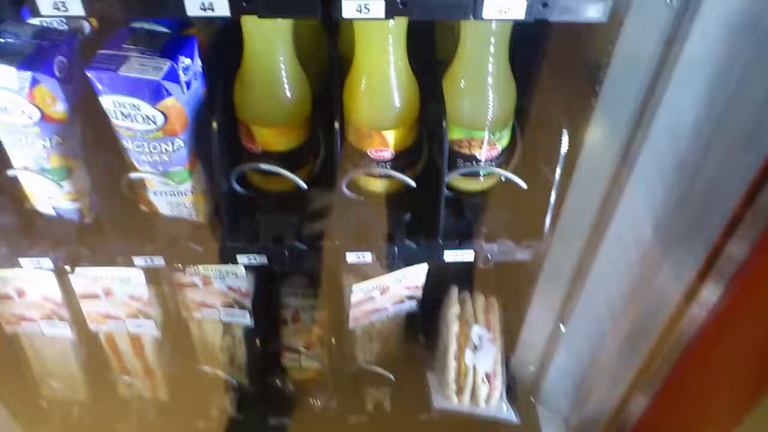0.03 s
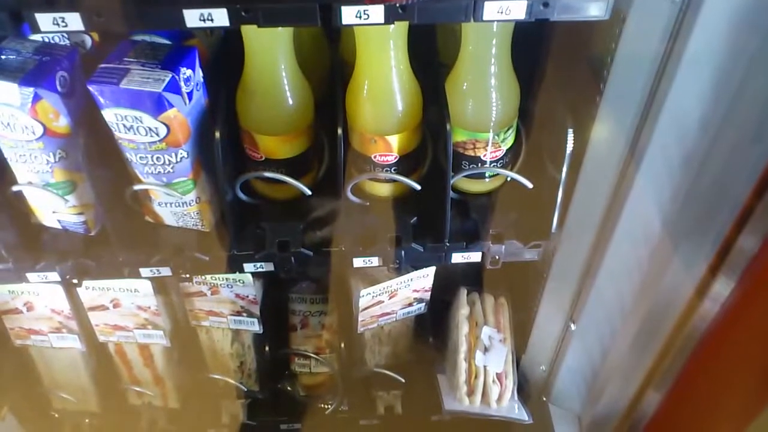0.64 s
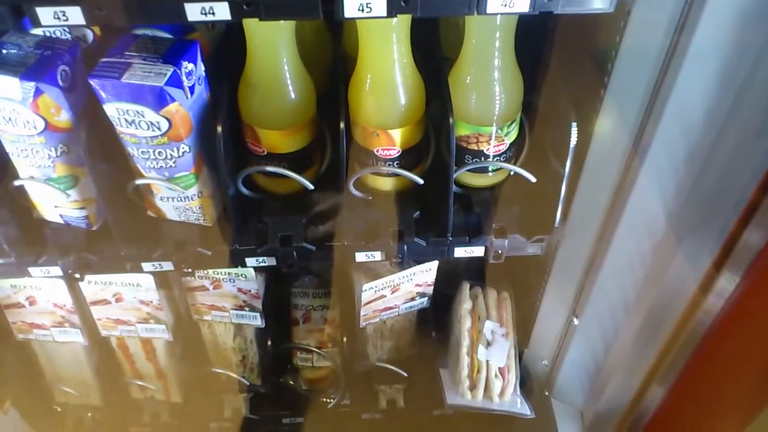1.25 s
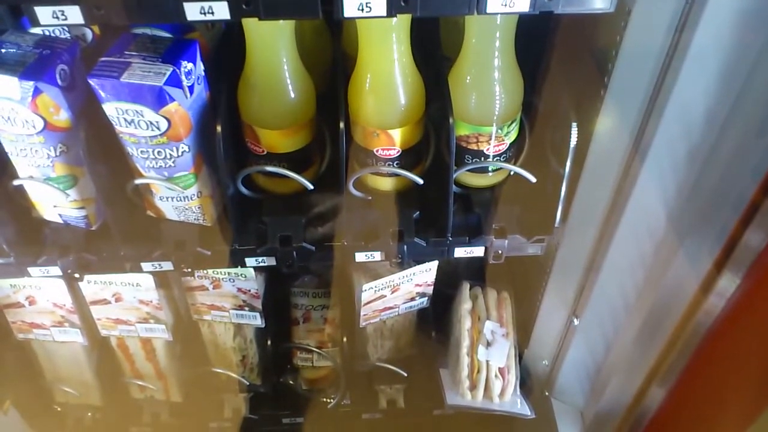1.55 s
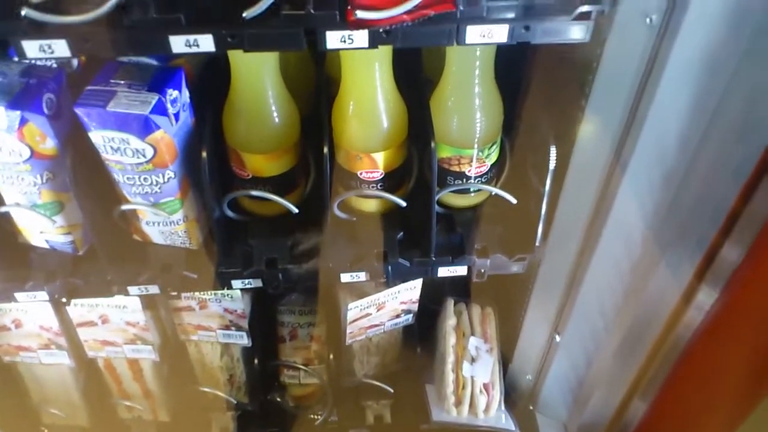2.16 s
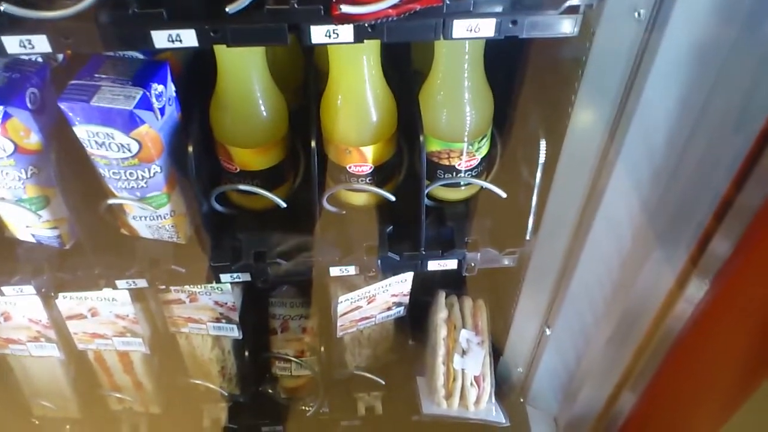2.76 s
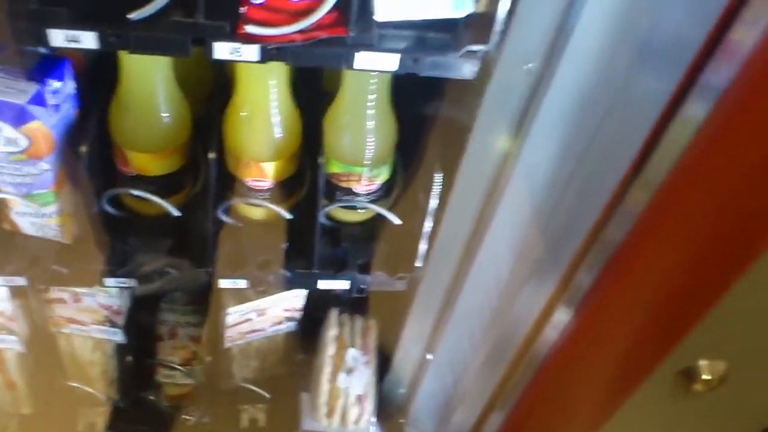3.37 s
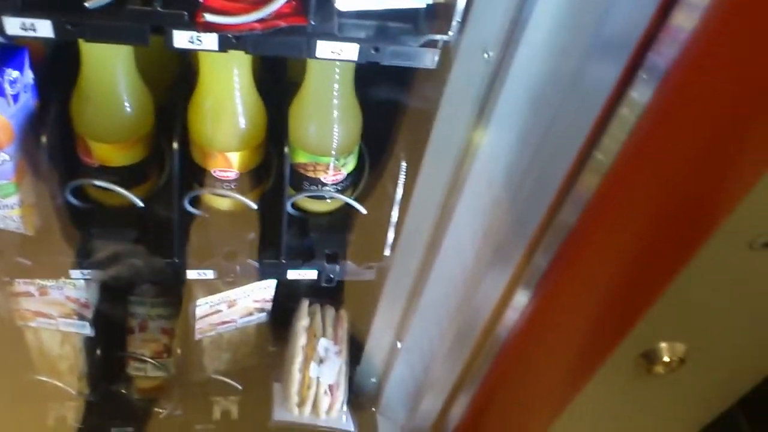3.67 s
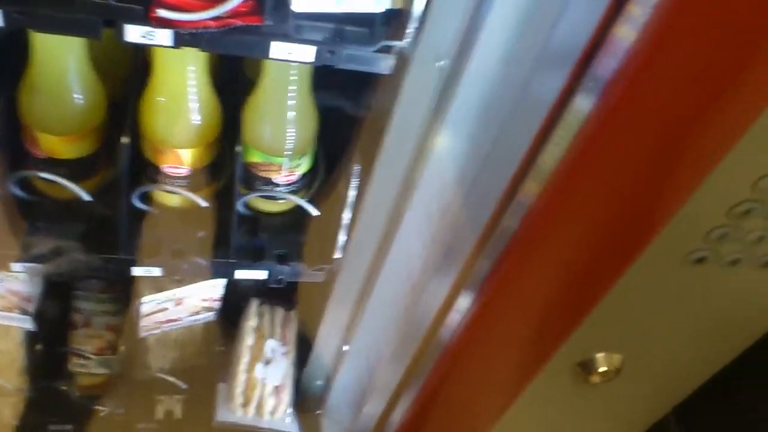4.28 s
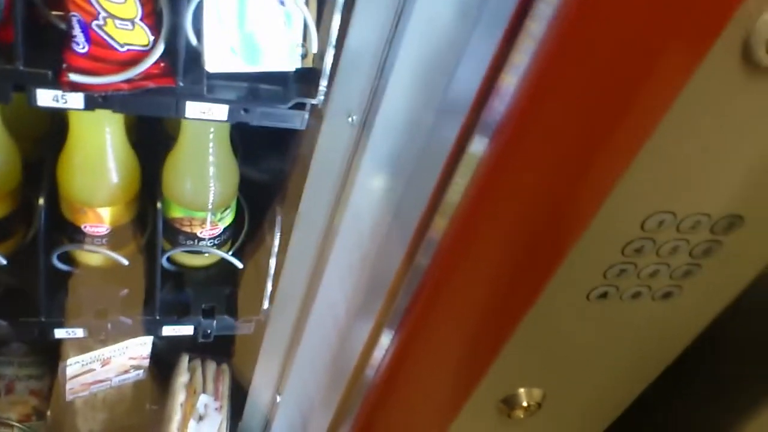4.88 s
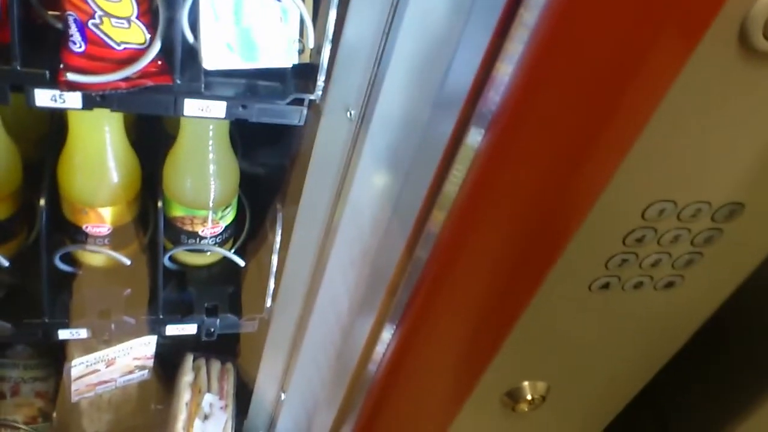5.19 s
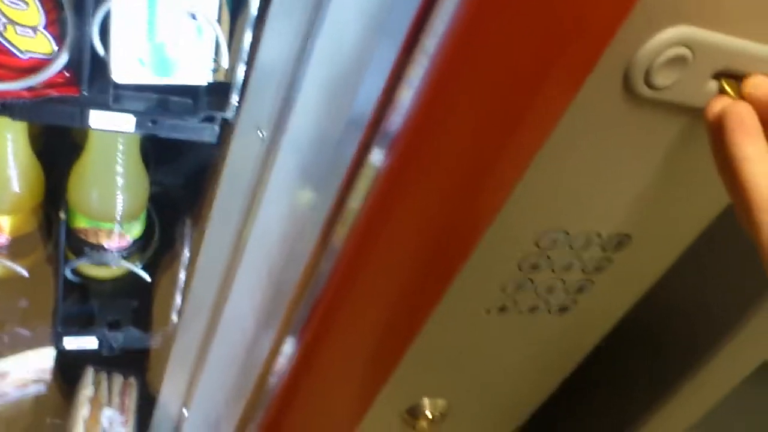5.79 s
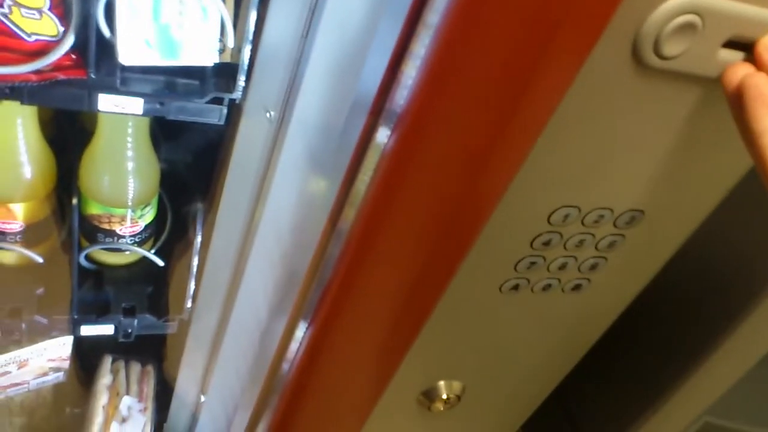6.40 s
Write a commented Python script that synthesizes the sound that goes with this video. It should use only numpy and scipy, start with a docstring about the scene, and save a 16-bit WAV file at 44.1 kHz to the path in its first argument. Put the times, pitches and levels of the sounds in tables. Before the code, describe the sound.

Two coins clatter down a vending machine's chute over a steady refrigerator hum, after one sharp tap on the microphone.

```python
"""Two coins rattle down the chute of a refrigerated vending machine in a hard-walled room.
Each knocks past the slot's flaps, rolls and strikes the walls, exciting the modes of coin, chute and
front panel. The first lands ringing on other coins, and the mechanism clacks after it.
Compressor, mains and fan hum throughout. The sound is picked up by a hand-held camera, which starts
a moment late and takes one sharp tap on its case."""
import sys
import numpy as np
from scipy import signal
from scipy.fft import rfft, irfft, next_fast_len
from scipy.io import wavfile
from scipy.ndimage import map_coordinates

SR = 44100
rng = np.random.default_rng(int(sys.argv[2]) if len(sys.argv) > 2 else 0)


def output_pcm(signal):
    """Save a mono or channel-first signal as 16-bit PCM at the path in sys.argv[1].

    Samples are clipped to [-1, 1] before scaling.
    """
    pcm = np.clip(np.atleast_2d(signal).T, -1, 1) * 32767
    wavfile.write(sys.argv[1], SR, np.round(pcm).astype(np.int16))


N = 288414
DIRECT_COHERENCE = 0.75  # left-right likeness of sound straight from the machine

# resonances of the chute and of the front panel: f/Hz, bandwidth/Hz, level/dB
CHUTE_RESONANCES = [(2040, 51, -6), (2320, 240, -2.5), (2592, 200, -3), (2980, 220, -5), (3526, 210, -5.5),
                    (3920, 340, -9.5), (4300, 820, -11)]
PANEL_RESONANCES = [(643, 206, -6.5), (867.4, 70, 0), (1022, 110, -7), (1144, 78, -12), (1325, 460, -12),
                    (1835, 190, -9.5)]
# spectra of a coin's steely chink and of the brighter glint of its edge: f/Hz, level/dB
CHINK_SPECTRUM = [(2500, -22), (4200, 4), (5000, 2), (6400, 7), (8200, -3.5), (9500, -19), (16000, -43)]
GLINT_SPECTRUM = [(7000, -23), (9000, -1.5), (10000, -3.5), (12000, -5.5), (14500, -8.5), (16000, -22.5)]
# modes of the first coin, damped by the chute: f/Hz, level/dB, T60/s
FIRST_COIN_MODES = [(4900, 1, .11), (5040, 0, .11), (5730, 2, .11), (8060, -4, .08), (9200, -8, .07),
                    (11260, -14, .09), (12800, -13, .1), (14100, -16, .09)]


def coin_clatter():
    """Impact excitation: each contact cracks, then coin, chute and panel ring in their normal modes."""
    # contacts of coin and mechanism: t/s, then level/dB of chink, glint, chute clack, panel knock
    contacts = [(4.141, -54, -76, -48.5, -43), (4.3347, -38, -58, -47, -33), (4.368, -37, -59, -45, -42),
                (4.3829, -26, -44.5, -37, -35), (4.3939, -29, -56, -43, -35.5), (4.419, -38, -66, -42, -44),
                (4.468, -35, -61, -46, -42), (4.5092, -22.5, -49, -36, -40.5),
                (4.5802, -27, -61, -40.5, -33), (4.659, -46, -66, -48, -38.5),
                (4.6676, -24, -45, -35, -34.5), (4.6957, -17.5, -48, -37, -44),
                (4.7024, -20, -48, -41, -46), (4.7098, -33, -55, -41, -39.5),
                (4.7374, -24.5, -62, -55, -57), (4.7548, -25, -59, -53, -64),
                (4.784, -20.5, -40.5, -44.5, -40.5), (5.0618, -28.5, -43, -44, -44),
                (5.0738, -25.5, -41, -41.5, -39), (5.141, -38, -57, -46, -57),
                (5.186, -30, -53, -38.5, -42), (5.2026, -33.5, -58, -41, -42.5),
                (5.232, -45, -63, -56, -53), (5.259, -43, -55, -51, -54), (5.2839, -32.5, -59, -43, -41.5),
                (5.325, -48, -66, -56, -41.5), (5.47, -38.5, -53, -50.5, -52),
                (6.2242, -25, -50.5, -32, -34.5), (6.2732, -30, -49.5, -35, -34),
                (6.2816, -33, -49, -34, -33), (6.291, -46, -61, -50, -35), (6.3572, -48, -66, -39.5, -48),
                (6.411, -41, -53, -36, -39.5), (6.4511, -33, -44, -32, -36), (6.4748, -33, -57, -39, -35),
                (6.4946, -35, -53, -37.5, -41.5)]
    # hardest strikes of edge on edge: t/s, level/dB
    edge_strikes = [(4.7085, -23.5), (4.7845, -23.5)]
    # resonances of the struck edge: f/Hz, bandwidth/Hz, level/dB
    edge_resonances = [(6350, 910, 7), (6300, 1800, 6), (7700, 330, -21), (13800, 1300, -10)]
    # modes of the second coin, and lower ringing modes of the first coin: f/Hz, level/dB, T60/s
    second_coin_modes = [(5050, 2, .14), (5720, 0, .14), (6416, 2, .15), (8656, -3, .12), (9500, 1, .08),
                         (9850, 1, .08), (13000, -6, .3), (13260, -10, .25), (14100, -9, .1),
                         (14771, -8, .14), (15250, -9, .14), (15600, -11, .1)]
    first_coin_low_modes = [(3630, -3, 0.15), (3910, -6, 0.14), (4280, 1.5, 0.17)]
    times, chink_db, glint_db, clack_db, knock_db = np.transpose(contacts)
    second = times > 6.1  # contacts of the second coin
    first = ~second
    chink = impacts(zip(times, chink_db - 13), spectrum(CHINK_SPECTRUM),
                    t60=0.046, crack_db=-1.5, crack_t60=0.0088, rise_s=0.0002)
    glint = impacts(zip(times, glint_db), spectrum(GLINT_SPECTRUM),
                    t60=0.04, crack_db=-3, crack_t60=0.01, rise_s=0.0002)
    clack = impacts(zip(times, clack_db + 0.5), resonant(CHUTE_RESONANCES),
                    t60=0.077, crack_db=-4.5, crack_t60=0.016, rise_s=0.00036)
    knock = impacts(zip(times, knock_db - 3.5), resonant(PANEL_RESONANCES),
                    t60=0.13, crack_db=0.5, crack_t60=0.011, rise_s=0.00054)
    chute = ringing(zip(times, clack_db + 1), as_modes(CHUTE_RESONANCES, sustain=4.6), detune=0.0201)
    panel = ringing(zip(times, knock_db - 5), as_modes(PANEL_RESONANCES, sustain=5.3), detune=0.033)
    edge = impacts(edge_strikes, resonant(edge_resonances),
                   t60=0.019, crack_db=-20, crack_t60=0.0085, rise_s=0.00028)
    # touching a wall detunes the coins slightly
    first_coin = ringing(zip(times[first], chink_db[first] - 16.5), FIRST_COIN_MODES, detune=0.0035)
    second_coin = ringing(zip(times[second], glint_db[second] - 2), second_coin_modes, detune=0.003)
    first_coin_low = ringing(zip(times[first], chink_db[first] - 19), first_coin_low_modes, detune=0.0045)
    clinks = housing(chink + glint + edge)
    return clinks + clack + knock + chute + panel + first_coin_low + first_coin + second_coin


def coin_rolling():
    """Roughness excitation: the milled rim scrapes along the chute, driving coin, chute and panel."""
    # runs along the chute: t/s, duration/s, rattle level/dB, hiss level/dB
    runs = [(4.376, 0.034, -51, -46), (4.508, 0.05, -45.5, -45.5), (4.664, 0.087, -49.5, -42.5),
            (5.051, 0.14, -53, -47), (5.204, 0.14, -52.5, -51), (5.468, 0.054, -54.5, -52.5),
            (6.28, 0.15, -49.5, -53.5), (6.443, 0.041, -59, -47)]
    # spectrum of the scraping rim: f/Hz, level/dB
    rim_spectrum = [(2000, -6), (3500, 12), (5000, 7.5), (7000, 2.5), (9500, -2), (12000, -9), (13500, -10),
                    (16000, -20)]
    attack_s, release_t60, friction_db_per_s = 0.0041, 0.24, 15
    rattle, hiss = np.zeros(N), np.zeros(N)
    for start, duration, rattle_db, hiss_db in runs:
        age = np.maximum(np.arange(N) / SR - start, 0)
        release = decay(np.maximum(age - duration, 0), release_t60)
        envelope = np.minimum(age / attack_s, 1) * amp(-friction_db_per_s * age) * release
        rattle += amp(rattle_db) * envelope
        hiss += amp(hiss_db) * envelope
    walls = lambda hz: resonant(PANEL_RESONANCES)(hz) + amp(-15.5) * resonant(CHUTE_RESONANCES)(hz)
    width_hz, peak_db = 79, -11  # the coin's modes stand out of the scrape
    coin = resonant([(hz, width_hz, peak_db) for hz, _, _ in FIRST_COIN_MODES])
    scrape = grains(lambda hz: spectrum(rim_spectrum)(hz) * (1 + coin(hz)), per_s=1500, spread_db=2)
    return rattle * grains(walls, per_s=420, spread_db=0.5) + hiss * housing(scrape)


def coin_heap():
    """Free vibration: the first coin lands on a heap of others, whose lightly damped modes ring on."""
    # landings: t/s, level/dB
    landings = [(4.669, -47), (4.696, -37), (4.708, -51), (4.785, -53)]
    # modes of the heap: f/Hz, level/dB, T60/s
    heap_modes = [(3425, -7, .4), (4414, -7, .35), (4743, -3, .3), (4978, 2, .38), (5055, -2, .4),
                  (5720, 1, .36), (5940, -2, .36), (6153, -5, .29), (6481, 0, .28), (6620, -2, .25),
                  (7362, -5, .4), (7693, -9, .35), (8090, -9, .33), (11068, -17, .4), (11458, -17, .3),
                  (12250, -17, .25), (12765, -13, .25), (13585, -12, .3), (14168, -16, .25),
                  (14577, -16, .22)]
    return amp(-4) * ringing(landings, heap_modes)


def slot_flaps():
    """Inharmonic modes: a light flap, knocked aside, rings briefly around its own pitch."""
    # knocks on the slot's lip and the flaps behind it: t/s, level/dB, pitch f/Hz
    knocks = [(4.334, -30, 1386), (4.389, -35, 1434), (4.5101, -35.5, 1326), (4.583, -35.5, 1850),
              (6.222, -27, 1428)]
    # modes of a flap: ratio to its pitch, level/dB, T60/s
    flap_modes = [(0.601, -8.5, .06), (.68, -9, 0.08), (.92, -6, 0.045), (1, 0, 0.054), (1.08, -6, .03)]
    out, t = np.zeros((2, N)), np.arange(SR // 8) / SR
    attack = 1 - np.exp(-t / 0.00037)
    for start, db, hz in knocks:
        ring = sum(amp(mode_db) * decay(t, t60) * np.sin(2 * np.pi * (hz * ratio * t + rng.random()))
                   for ratio, mode_db, t60 in flap_modes)
        add(out, start, amp(db) * ring * attack)
    return out


def cabinet_booms():
    """Structural resonance: the cabinet booms in its low modes."""
    # booms: t/s, level/dB
    booms = [(4.68, -36), (5.485, -33)]
    # cabinet resonances: f/Hz, bandwidth/Hz, level/dB
    resonances = [(143.4, 9, 3.5), (202, 60, -1), (520, 248, -13)]
    return impacts(booms, resonant(resonances), t60=0.37, crack_db=-20, crack_t60=0.021, rise_s=0.0034)


def pane_bumps():
    """Plate resonance: dull bumps against the front panel shake its pane."""
    # bumps: t/s, level/dB
    bumps = [(3.880, -42.5), (3.905, -48)]
    # pane resonances: f/Hz, bandwidth/Hz, level/dB
    resonances = [(718, 81, -7), (890, 180, 1), (2010, 1400, -17.5)]
    return impacts(bumps, resonant(resonances), t60=0.16, crack_db=-8, crack_t60=0.02)


def coins_in_hand():
    """Light impacts: coins touching in the hand give faint, bright ticks."""
    # ticks: t/s, level/dB
    ticks = [(3.113, -73), (3.652, -64), (3.944, -68), (4.095, -71)]
    response = lambda hz: spectrum(CHINK_SPECTRUM)(hz) + spectrum(GLINT_SPECTRUM)(hz)
    return impacts(ticks, response, t60=0.041, crack_db=6, crack_t60=0.021, rise_s=0.001)


def camera_tap():
    """Structure-borne sound: a snap and a brief ring cross the case to each microphone unequally."""
    # contacts within the one tap: t/s, level/dB
    contacts = [(1.9383, -40), (1.9645, -19.5), (1.975, 4.5)]
    # spectrum of the snap: f/Hz, level/dB, left minus right/dB
    snap_spectrum = [(203, 0.5, 4.5), (700, 4, -4), (1200, 7, -11), (1800, 6.5, -11), (2250, 12.5, -10),
                     (2960, 13.5, -10.5), (3460, 10.5, -9), (3875, -5, -4.5), (4500, -3, -10),
                     (5100, 10, -10), (5720, 4, -2.5), (6400, 12, 1.5), (7300, -6.5, 0), (8800, 4, 1),
                     (10500, -5, -1.5), (12500, -7.5, 5), (15520, -19, 8)]
    # modes of the case: f/Hz, level/dB, T60/s, left minus right/dB
    case_modes = [(480, -26.5, 0.026, 4), (1270, -26, 0.016, -5.5), (1680, -29.5, 0.0155, -9)]
    out, t = np.zeros((2, N)), np.arange(SR // 20) / SR
    snap = np.array([click([(hz, db + side * pan_db / 2) for hz, db, pan_db in snap_spectrum])
                     for side in (1, -1)])
    snap *= decay(t[:snap.shape[1]], t60=0.02)
    ring = sum(amp([[db + pan_db / 2], [db - pan_db / 2]]) * decay(t, t60) * np.cos(2 * np.pi * hz * t)
               for hz, db, t60, pan_db in case_modes)
    for start, db in contacts:
        add(out, start, amp(db) * snap)
        add(out, start, amp(db) * ring)
    return out


def refrigerator():
    """Beating: compressor and mains tones interfere over the rumble and hiss of the fan."""
    # compressor, mains and fan tones: f/Hz, rms level/dB, unsteadiness/dB
    hum_tones = [(23.3, -64, 0.5), (48.24, -67, 3.5), (84.5, -63, 1), (97.38, -55, 0.5), (100.15, -46, 1),
                 (109.1, -51.5, 5), (146, -63.5, 3.5), (147.6, -71, 3.5), (200.5, -48.5, 1.5),
                 (214.4, -59.5, 6), (252.8, -55, 4.5), (339, -55.5, 1.5), (387.4, -54, 1.5),
                 (441, -73.5, 6.5), (485.3, -45, 1.8), (574, -74.5, -1), (3235, -81.5, 4), (4990, -87.5, 3)]
    # narrow cabinet resonance driven by the fan: f/Hz, bandwidth/Hz, level/dB
    drone_resonance = [(193.7, 13, 0)]
    # spectra of the fan's rumble and of its rushing air: f/Hz, level/dB
    rumble_spectrum = [(8, -26.5), (22, 3.5), (60, -1), (100, -2), (120, -6.5), (145, 8.5), (170, -4.5),
                       (200, 3), (245, 3.5), (310, -3), (400, -4.5), (580, -7.5), (720, -17.5), (1100, -54)]
    air_spectrum = [(350, -33.5), (600, -3), (919, -6.5), (1080, -4.5), (1900, -15.5), (3160, -18.5),
                    (3680, -22), (6030, -28.5), (12700, -48), (16000, -53.5)]
    t = np.arange(N) / SR
    hum = 0
    for hz, db, unsteady_db in hum_tones:
        phase = rng.uniform(0, 2 * np.pi) + 0.082 * unsteady_db * wobble(3.67)
        swell = amp(unsteady_db * wobble(3.07))
        hum += amp(db) * unit_rms(swell * np.sin(2 * np.pi * hz * t + phase))
    drone = amp(-49.5) * noise(resonant(drone_resonance))
    rumble = amp(-46.5 + 1.6 * wobble(5.6)) * noise(spectrum(rumble_spectrum))
    air = amp(-58 + 0.28 * wobble(7.5)) * noise(spectrum(air_spectrum))
    return (hum + drone + rumble + air) * amp([[-0.45], [0.45]])


def housing(x, echo_db=-6):
    """Comb filtering: quick echoes between the steel walls make the clinks sound hollow."""
    t = np.arange(SR // 40) / SR
    echoes = rng.standard_normal((2, len(t))) * decay(t, t60=0.02) * (t > 0.0006)
    echoes = amp(echo_db) * echoes / np.linalg.norm(echoes, axis=1, keepdims=True)
    response = (echoes + (t == 0)) / np.sqrt(1 + amp(echo_db) ** 2)
    return signal.fftconvolve(x, response, axes=1)[:, :N]


def room(x):
    """Diffuse reverberation: each quarter second of sound takes new paths and gets its own tail."""
    # reverberation times: f/Hz, T60/s
    reverb_times = [(200, 0.69), (1000, 1), (3000, 0.89), (6000, 0.57), (14000, 0.13)]
    out, hop = np.zeros((2, N)), SR // 4
    for start in range(0, N, hop):
        hz, t, bands = signal.stft(noise(np.ones_like, size=SR * 3 // 4), SR, nperseg=256)
        build_up = 1 - decay(t, 0.0063)
        dying = decay(t, log_interp(reverb_times, hz)[:, None])
        tail = signal.istft(bands * build_up * dying, SR, nperseg=256)[1]
        tail /= np.linalg.norm(tail[0])
        add(out, start / SR, signal.fftconvolve(x[:, start:start + hop], tail, axes=1))
    return out


def from_the_right(x, lag_s=0.000135):
    """Path difference: the slot lies to the right, so its sound reaches the left channel later."""
    return filtered(x, lambda hz: np.exp(np.outer([-1, 1], 1j * np.pi * hz * lag_s)))


def impacts(blows, response, t60, crack_db, crack_t60, rise_s=0.00032):
    """Modal overlap: each blow (t/s, level/dB) cracks, then dies away as noise in crowded modes."""
    out, t = np.zeros((2, N)), np.arange(SR // 3) / SR
    envelope = (decay(t, t60) + amp(crack_db) * decay(t, crack_t60)) * (1 - np.exp(-t / rise_s))
    for start, db in blows:
        add(out, start, amp(db) * envelope * noise(response, size=len(t), direct=True))
    return out


def ringing(strikes, modes, detune=0):
    """Modal superposition: each strike (t/s, level/dB) rings a body's modes at new strengths."""
    out, t = np.zeros((2, N)), np.arange(SR // 2) / SR
    for start, db in strikes:
        ring = 0
        for hz, mode_db, t60 in modes:
            stereo_phase = np.arccos(DIRECT_COHERENCE) * rng.standard_normal() * np.array([[.5], [-.5]])
            detuned_hz = hz * (1 + detune * rng.standard_normal())
            phase = 2 * np.pi * (detuned_hz * t + rng.random()) + stereo_phase
            ring += amp(mode_db + 2 * rng.standard_normal((2, 1))) * decay(t, t60) * np.sin(phase)
        add(out, start, amp(db) * ring / 2)
    return out


def grains(response, per_s, spread_db):
    """Shot noise: random, overlapping ticks of uneven size, at rms 1."""
    ticks = (rng.random(N) < per_s / SR) * amp(spread_db * rng.standard_normal(N))
    t = np.arange(SR // 20) / SR
    envelope = signal.fftconvolve(ticks, decay(t, 0.023) - decay(t, 0.0026))[:N]
    return unit_rms(envelope * noise(response, direct=True))


def noise(response, size=N, direct=False):
    """Partial coherence: mid and side noise mix to a direct or a diffuse stereo field of rms 1."""
    # left-right likeness of diffuse sound: f/Hz, coherence
    diffuse_coherence = [(25, 0.26), (100, 0.99), (400, 0.79), (680, 0.64), (1400, -0.06), (3100, -0.09),
                         (7000, -0.17), (15000, 0.94)]
    fft_size = next_fast_len(size, True)
    hz = np.fft.rfftfreq(fft_size, 1 / SR)
    coherence = np.full_like(hz, DIRECT_COHERENCE) if direct else log_interp(diffuse_coherence, hz)
    angle = np.arccos(coherence) / 2
    white = rfft(rng.standard_normal((2, fft_size)))
    mid, side = irfft(white * response(hz) * [np.cos(angle), np.sin(angle)], fft_size)[:, :size]
    return unit_rms(np.array([mid + side, mid - side]))


def click(points, size=2048):
    """Minimum phase: the causal click with a given spectrum (f/Hz, level/dB)."""
    cepstrum = irfft(np.log(spectrum(points)(np.fft.rfftfreq(size, 1 / SR))))
    causal_fold = np.r_[1, np.full(size // 2 - 1, 2), np.zeros(size // 2)]
    return irfft(np.exp(rfft(cepstrum * causal_fold)))


def resonant(peaks):
    """Resonance: a response of Lorentzian peaks (f/Hz, bandwidth/Hz, level/dB)."""
    return lambda hz: sum(amp(db) / (1 + ((hz - centre) / (width / 2)) ** 2)
                          for centre, width, db in peaks)


def as_modes(resonances, sustain):
    """Time-bandwidth reciprocity: narrower resonances give longer modes (f/Hz, level/dB, T60/s)."""
    return [(hz, db, sustain * np.log(1000) / (np.pi * width)) for hz, width, db in resonances]


def spectrum(points):
    """Spectral envelope: the response through points (f/Hz, level/dB)."""
    return lambda hz: amp(log_interp(points, hz))


def filtered(x, response):
    """Linear filtering: the spectrum of x times a frequency response."""
    size = next_fast_len(N + SR // 2)
    return irfft(rfft(x, size) * response(np.fft.rfftfreq(size, 1 / SR)), size)[..., :N]


def log_interp(points, hz):
    """Interpolation of points (f/Hz, value) on a logarithmic frequency axis."""
    knots_hz, values = np.transpose(points)
    return np.interp(np.log(hz + 1), np.log(knots_hz + 1), values)


def wobble(per_s):
    """Random modulation: a smooth curve with per_s knots a second."""
    knots = rng.standard_normal(int(N * per_s / SR) + 4)
    return map_coordinates(knots, [np.arange(N) * per_s / SR])


def decay(t, t60):
    """Exponential damping: a fall of 60 dB in t60."""
    return np.exp(-np.log(1000) * t / t60)


def amp(db):
    """Level to amplitude ratio."""
    return 10 ** (np.asarray(db) / 20)


def unit_rms(x):
    """Normalisation to rms 1."""
    return x / np.sqrt(np.mean(x ** 2) + 1e-20)


def add(track, start_s, sound):
    """Superposition of a sound on the track from start_s."""
    part = track[:, round(start_s * SR):][:, :sound.shape[-1]]
    part += sound[..., :part.shape[1]]


def scene():
    """Superposition: direct and reverberant coin sound, plus booms, refrigerator and tap."""
    # level difference due to the slot's position: f/Hz, left minus right/dB
    balance = [(700, 0), (1300, 0.5), (2400, -1.5), (4400, -2), (8100, 3), (15000, 10)]
    ticks, bumps, booms = coins_in_hand(), pane_bumps(), cabinet_booms()
    heap, flaps = coin_heap(), slot_flaps()
    coins = coin_clatter() + coin_rolling() + heap + ticks + bumps
    direct = from_the_right(coins + flaps)
    reverberant = amp(-11) * room(coins + amp(-6.5) * flaps)  # the flaps face the listener: less room
    placed = filtered(direct + reverberant, lambda hz: amp(np.outer([.5, -.5], log_interp(balance, hz))))
    return placed + booms + refrigerator() + camera_tap()


def record(dry, start_s=0.614, ceiling=0.93, cutoff_hz=15900):
    """Gating, clipping and band limiting: the camera starts late, caps peaks and cuts the top treble."""
    running = np.clip((np.arange(N) / SR - start_s) / 0.001, 0, 1)
    clipped = np.clip(dry * running, -ceiling, ceiling)
    return filtered(clipped, lambda hz: 1 / (1 + (hz / cutoff_hz) ** 100))


dry = scene()
out = record(dry)
output_pcm(out)
```